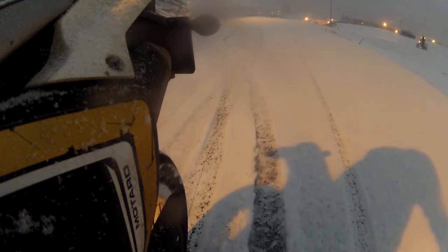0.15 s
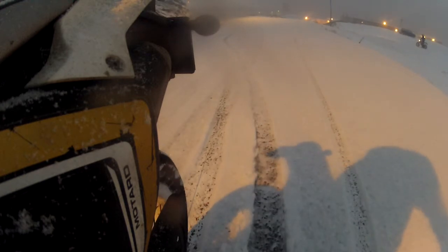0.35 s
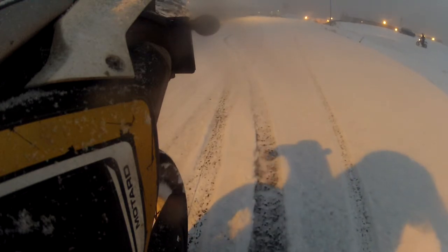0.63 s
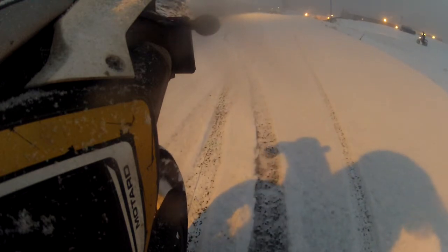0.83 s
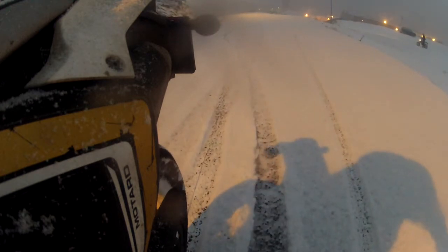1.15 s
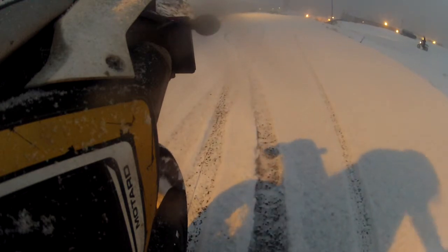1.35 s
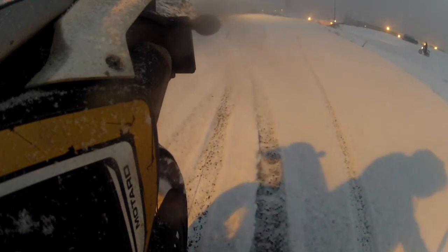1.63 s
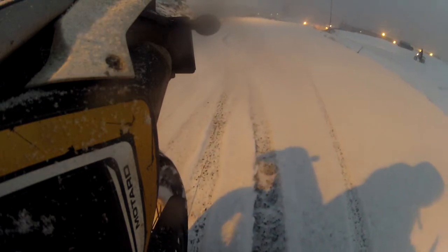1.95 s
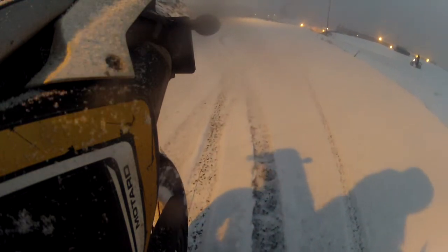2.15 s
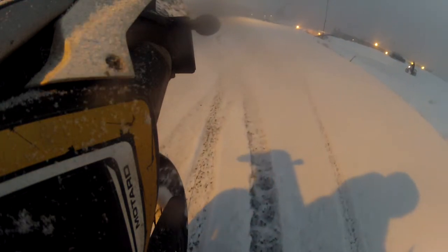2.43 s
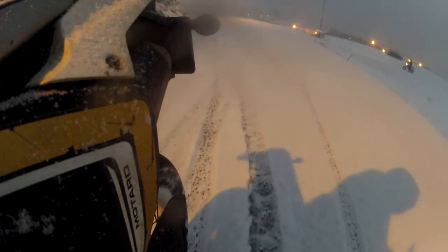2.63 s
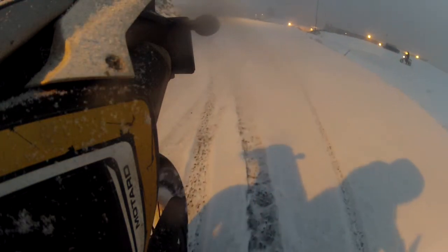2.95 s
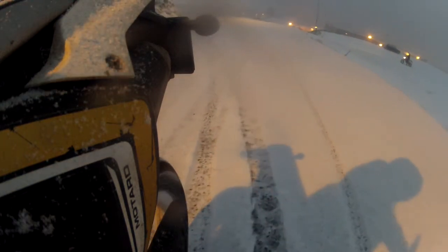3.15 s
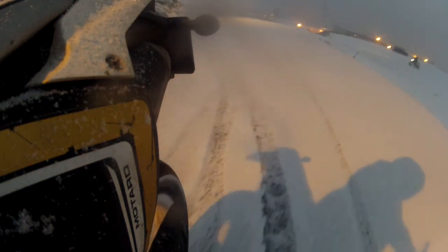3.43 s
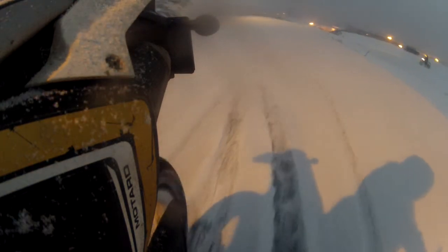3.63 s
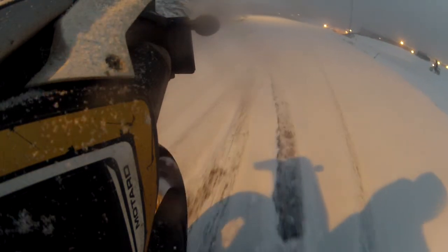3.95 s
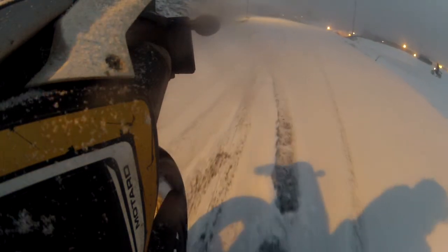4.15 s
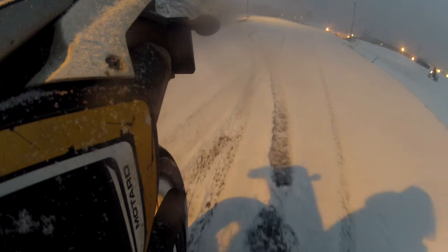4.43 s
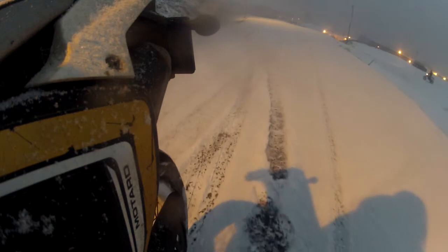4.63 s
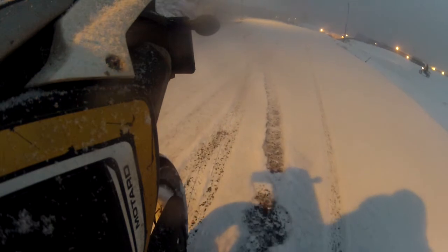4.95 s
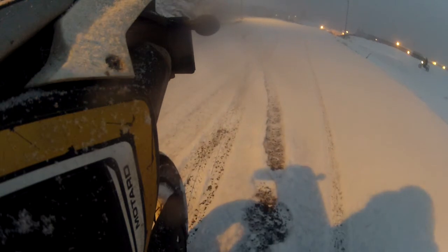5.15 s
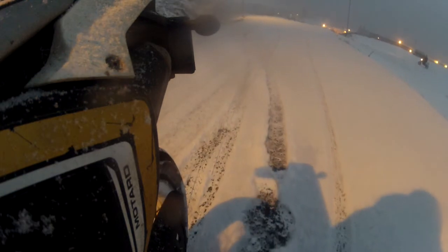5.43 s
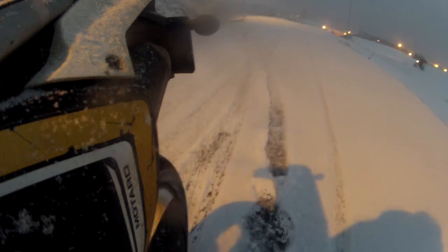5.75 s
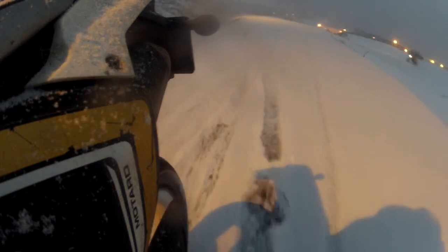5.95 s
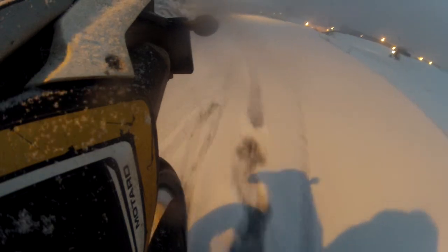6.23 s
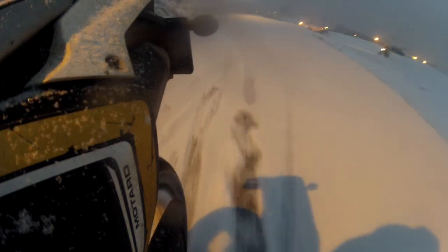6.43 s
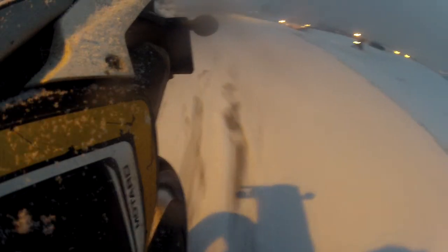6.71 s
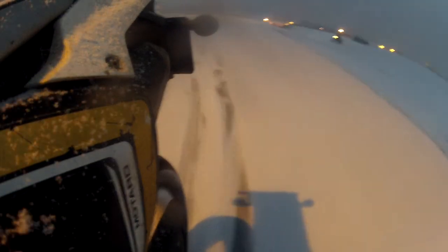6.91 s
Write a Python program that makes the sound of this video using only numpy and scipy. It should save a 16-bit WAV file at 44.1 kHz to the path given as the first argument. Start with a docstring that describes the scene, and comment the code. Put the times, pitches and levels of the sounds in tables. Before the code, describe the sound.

A small two-stroke motorbike sinks to a sputtering, popping idle, then is revved several times and finally screams away, heard gritty and close from the bike.

```python
"""A small two-stroke motorbike runs down to a popping idle, then is revved four times on a snowy road.
Every crank turn pumps a puff through airbox and exhaust; only turns that fire add a sharp crack.
The piston rattles in between; chain, tyres and air rush underneath.
A camera on the bike limits the peaks, samples at a low rate and holds each sample, which mirrors the
sound into a gritty treble."""
import sys
import numpy as np
from scipy import signal
from scipy.fft import rfft, irfft
from scipy.io import wavfile
from scipy.ndimage import uniform_filter1d

SR = 44100
rng = np.random.default_rng(int(sys.argv[2]) if len(sys.argv) > 2 else 0)


def store_wav(level_fs):
    """Save 16-bit WAV to argv[1]."""
    pcm = np.round(np.clip(np.atleast_2d(level_fs), -1, 1) * 32767)
    wavfile.write(sys.argv[1], SR, pcm.T.astype(np.int16))


N = 312224
TIME = np.arange(N) / SR   # [s]


def from_db(db):
    """Decibels to gain."""
    return 10 ** (np.asarray(db) / 20)


def in_time(rows):
    """Interpolate each column of a time table at every sample."""
    time_s, *columns = np.transpose(rows)
    return [np.interp(TIME, time_s, column) for column in columns]


def at_speed(rows, speed):
    """Read a (crank speed, level) table at the crank speed."""
    turns_per_s, db = np.transpose(rows)
    return np.interp(speed, turns_per_s, db)


def rms_one(x):
    """Scale to unit power."""
    return x / np.sqrt(np.mean(x ** 2) + 1e-20)


def evened(x, size=2600):
    """Unit power from moment to moment; detail shorter than the window [samples] keeps its shape."""
    power = uniform_filter1d(uniform_filter1d(x ** 2, size), size)
    return x / np.sqrt(np.abs(power) + 1e-14)


def cut(x, hz, kind, order=2):
    """Butterworth low-pass or high-pass."""
    return signal.sosfilt(signal.butter(order, hz, kind, fs=SR, output="sos"), x)


def resonate(x, modes):
    """Parallel two-pole resonances with alternating signs."""
    out = 0
    for k, (hz, width_hz, db) in enumerate(modes):
        radius = np.exp(-np.pi * width_hz / SR)
        poles = [1, -2 * radius * np.cos(2 * np.pi * hz / SR), radius ** 2]
        gain = (-1) ** k * from_db(db) * (1 - radius ** 2) / 2
        out = out + gain * signal.lfilter([1, 0, -1], poles, x + 1e-18)
    return out


def clicks(times_s, sizes):
    """Impulses placed between samples."""
    at = np.clip(times_s * SR, 0, N - 2)
    out = np.zeros(N)
    np.add.at(out, at.astype(int), sizes * (1 - at % 1))
    np.add.at(out, at.astype(int) + 1, sizes * (at % 1))
    return out


def gush(pulses, decay_s, rise_s=0.00011):
    """Turbulence after each pulse: noise that swells briefly and dies, with about the pulse's energy."""
    decay, swell = np.exp(-1 / (np.array([decay_s, rise_s]) * SR))
    envelope = signal.lfilter([np.sqrt(1 - decay ** 2)], [1, -decay], pulses + 1e-18)
    return signal.lfilter([1 - swell], [1, -swell], envelope) * rng.standard_normal(N)


def scatter(x, delays_s=(0.0009, 0.0014, 0.0023), reflection=0.38):
    """Reflections between the baffles, as all-passes, spread a pulse in time alike on every turn."""
    for delay_s in delays_s:
        poles = np.r_[1, np.zeros(int(delay_s * SR)), -reflection]
        x = signal.lfilter(poles[::-1], poles, x + 1e-18)
    return x


# chain, tyres and air, relative spectral density: (frequency [Hz], level [dB per Hz])
ROLLING_SPECTRUM = [(20, -7), (60, 4), (200, 4), (400, -0.5), (680, -17.5), (950, -10), (1300, -17.5),
                    (2000, -29), (2500, -49), (2900, -33.5), (4000, -31), (5800, -48)]


def rolling(speed):
    """A smooth rush of chain, tyres and air: shaped noise that grows with crank speed."""
    hz, db = np.transpose(ROLLING_SPECTRUM)
    bins_hz = np.maximum(np.arange(N // 2 + 1) * SR / N, 1)
    shape = from_db(np.interp(np.log(bins_hz), np.log(hz), db))
    rush = irfft(rfft(rng.standard_normal(N)) * shape, N)
    return from_db(-31.0 + 1.85 * np.log2(speed / speed.min())) * rms_one(rush)


# shake of the unbalanced crank: (crank speed [turns/s], level [dB])
SHAKE_LEVEL = [(22, -42), (34, -49), (44, -23), (54, -26), (68, -38), (72, -23), (78, -39), (100, -86)]


def shake(angle, speed):
    """The unbalanced crank shakes the frame once a turn, at a level that depends on speed."""
    return from_db(at_speed(SHAKE_LEVEL, speed)) * np.sqrt(2) * np.cos(2 * np.pi * angle)


# piston rattle resonances: (frequency [Hz], width [Hz], relative level [dB])
PISTON_MODES = [(2160, 92, 8.5), (2510, 380, -14.5), (1854, 330, -2.5), (1200, 174, 9)]


def piston(angle, speed, slap_turn=0.849, width_turn=0.11, spread_db=3.84):
    """The piston rattles across the bore shortly before each port opening."""
    turn = (angle - angle.min() // 1).astype(int)
    strength = from_db(spread_db * rng.standard_normal(turn.max() + 1))[turn]
    gate = np.exp(-0.5 * ((angle % 1 - slap_turn) / width_turn) ** 2)
    ringing = evened(resonate(rng.standard_normal(N), PISTON_MODES), size=160)
    rattle = cut(ringing, 2800, "low", order=6)
    level = from_db(-31 + 3.65 * np.log2(speed / speed.min()))
    return level * strength * gate * rattle


# throttle held open, every turn fires: (opens [s], closes [s], relative crack level [dB])
OPEN_THROTTLE = [(2.785, 3.755, -19.5), (4.615, 4.748, -20), (4.9, 5.027, -19.5), (5.395, 7.1, -18.5)]


def throttle():
    """1 while the throttle is open, 0 while it is closed, with smoothed edges."""
    held_open = sum((TIME > opens_s) * (TIME < closes_s) for opens_s, closes_s, _ in OPEN_THROTTLE)
    return np.clip(uniform_filter1d(held_open.astype(float), size=1300), 0, 1)


def firing_strength(turn_s, edge_s=0.044, edge_db=-6.5):
    """Crack size on each turn: weaker near opening and closing, zero while the throttle is closed."""
    sizes = 0
    for opens_s, closes_s, db in OPEN_THROTTLE:
        inside_s = np.minimum(turn_s - opens_s, closes_s - turn_s)
        edge = np.clip(1 - inside_s / edge_s, 0, 1)
        sizes = sizes + (inside_s > 0) * from_db(db + edge_db * edge)
    return sizes


def puffs(turn_s, spread_db, turbulence, decay_s):
    """One uneven puff each time the port opens, trailed by turbulence."""
    pulses = clicks(turn_s, from_db(spread_db * rng.standard_normal(len(turn_s))))
    return pulses + turbulence * gush(pulses, decay_s)


# boom resonances: (frequency [Hz], width [Hz], relative level [dB])
AIRBOX_MODES = [(86.9, 6.5, 2), (85, 33.3, -11)]
EXHAUST_MODES = [(149.56, 7.3, 2), (165.3, 7, -2.5), (125.8, 12, -9.5)]
# relative loudness of the booms over time: (time [s], airbox level [dB], exhaust level [dB])
BOOM_LEVEL = [(0.0, -2, 2), (1.0, -1, 1.5), (1.55, 5, -0.5), (2.1, -2, 0), (2.85, 4, 5), (3.18, -6, -7),
              (3.55, -0.5, -0.5), (3.85, -3.5, 4), (4.1, -1.5, -9), (4.42, 2.5, -0.5), (4.75, -2.5, 4),
              (5.25, 0.5, 0.5), (7.08, 2, -2.5)]


def boom(turn_s, speed, racing, cruise_turns_per_s=76.7, port_open_turns=0.13, second_puff=0.41):
    """Airbox and exhaust swell whenever a multiple of the crank speed meets their resonance."""
    octaves = np.log2(speed / cruise_turns_per_s)
    airbox_trim_db, exhaust_trim_db = in_time(BOOM_LEVEL)
    airbox_db = 49.5 + 4.5 * octaves - 25 * racing + airbox_trim_db
    exhaust_db = 43.5 + 6 * octaves - 6 * throttle() + 3 * racing + exhaust_trim_db

    intake = puffs(turn_s, spread_db=1.0, turbulence=0.23, decay_s=0.027)
    # the intake draws again, more weakly, after each puff
    intake = intake + second_puff * np.interp(TIME - port_open_turns / speed, TIME, intake, left=0)
    airbox = cut(resonate(from_db(airbox_db) * intake, AIRBOX_MODES), 190, "low", order=4)

    outlet = puffs(turn_s, spread_db=0.3, turbulence=0.25 - 0.077 * racing, decay_s=0.015)
    exhaust = cut(resonate(from_db(exhaust_db) * outlet, EXHAUST_MODES), 196.5, "low", order=4)
    return airbox + exhaust


# resonances of silencer, untuned pipe, pipe in tune: (frequency [Hz], width [Hz], relative level [dB])
SILENCER_MODES = [(238.6, 52, -8), (274.7, 24, 6.5), (313, 54, -3.5), (394.2, 25.8, 5), (415, 29.5, -5),
                  (513, 28, -17.5)]
PIPE_MODES = [(843, 31, 8.5), (910.4, 14.2, 14.5), (1028, 7.7, 6), (1190, 36, 5.5), (1269, 63, -1),
              (1370, 85, -3), (1647, 58, -3.5), (1706, 20, 2.5), (2400, 83, -4)]
TUNED_PIPE_MODES = [(844, 310, -5.5), (1240, 60, 6.5), (1292, 34, 8.5), (1558, 140, 7), (1616, 144, 7.5),
                    (1754.4, 58, 8.5), (2157, 36, 4), (2423, 44, 5.5), (610, 150, -12)]
# drone peaks where twice the crank speed meets the silencer: (crank speed [turns/s], base level [dB])
DRONE_LEVEL = [(22, -31), (50, -29.5), (80, -32.5), (110, -34), (135, -25), (141, -24), (145, -33),
               (150, -27), (157, -28.5)]
# pipe rises from idle, steady at 70 to 144 turns/s, weaker above: (crank speed [turns/s], base level [dB])
PIPE_LEVEL = [(22, -35), (40, -30), (70, -25), (110, -24), (137, -25), (144, -24), (150, -28), (157, -30.5)]


def pumping(turn_s, speed, racing, drone_open_db=7, pipe_open_db=6.5):
    """Puffs drone in the silencer and rasp in the pipe; with open throttle the pipe tunes in and sings."""
    is_open = throttle()
    drone_db = at_speed(DRONE_LEVEL, speed) + drone_open_db * is_open
    pipe_db = at_speed(PIPE_LEVEL, speed) + pipe_open_db * is_open

    low = puffs(turn_s, spread_db=0.8, turbulence=0.3 - 0.1 * racing, decay_s=0.01)
    drone = cut(resonate(low, SILENCER_MODES), 273, "high", order=4)
    drone = cut(drone, 437, "low", order=4)
    # fast puffs merge and lose their edge
    drone = (1 - racing) * drone + racing * cut(drone, 237, "low")

    high = puffs(turn_s, spread_db=1.8, turbulence=0.6, decay_s=0.012)
    rasp = cut(resonate(high, PIPE_MODES), 630, "high", order=4)
    rasp = cut(rasp, 2970, "low", order=4)

    clean = puffs(turn_s, spread_db=0.7, turbulence=0.16, decay_s=0.005)
    song = cut(resonate(clean, TUNED_PIPE_MODES), 590, "high")
    song = cut(song, 2690, "low", order=4)

    tuned = is_open * (0.9 + 0.1 * racing)
    pipe = np.sqrt(np.abs(1 - tuned)) * evened(rasp) + from_db(0.5) * np.sqrt(tuned) * evened(song)
    return from_db(drone_db) * evened(drone) + from_db(pipe_db) * pipe


# expansion chamber resonances: (frequency [Hz], width [Hz], relative level [dB])
CHAMBER_MODES = [(374, 53.7, 7), (885, 21, 7), (1206, 77, 15.5), (1234.3, 57, 13), (1600, 53, 3),
                 (1680, 165, 6), (1718, 91, 10), (2203, 126, 6), (2360, 222, 7), (2547, 221, 4),
                 (2870, 330, -7.5), (3160, 250, -7.5), (3860, 530, -6.5), (4115, 230, -15.5),
                 (4283, 42, -14), (4870, 215, -11.5), (5120, 420, -11.5)]


def chamber(blast, echo_s=0.0038, echo=0.35):
    """A blowdown rings the expansion chamber and comes back, duller, from its end cone."""
    back = np.interp(TIME - echo_s, TIME, cut(blast, 3040, "low"), left=0)
    ringing = cut(resonate(blast + echo * back, CHAMBER_MODES), 172, "high")
    return cut(ringing, 5600, "low", order=4)


def putts(turn_s, speed, idle_turns_per_s=33, chance=0.45, putt_db=-24.5, recharge_s=0.049):
    """Weak firings on random idling turns with no pop near: rows (time [s], relative level [dB])."""
    apart_s = np.abs(turn_s[:, None] - np.array(STRAY_FIRINGS)[:, 0]).min(axis=1)
    idling = np.interp(turn_s, TIME, speed) < idle_turns_per_s
    fires = idling & (apart_s > recharge_s) & (rng.random(len(turn_s)) < chance)
    return np.c_[turn_s, putt_db + 1.5 * rng.standard_normal(len(turn_s))][fires]


# lone firings on a closed throttle: (time [s], relative level [dB])
STRAY_FIRINGS = [(0.0014, -6.5), (0.0763, -10.5), (0.0955, -8), (0.194, -6.5), (0.2587, -14), (0.3251, -7),
                 (0.42, -3.5), (0.5214, -5.5), (0.63, -6.5), (0.8579, -10), (0.974, -16), (1.057, -20),
                 (1.369, -25), (1.4626, -26), (1.5959, -23.5), (1.8066, -10), (1.919, -8), (2.0239, -8),
                 (2.1284, -24), (2.163, -22), (2.2334, -11.5), (2.3446, -10.5), (2.5373, -23.5),
                 (2.6598, -14), (2.7376, -16), (2.77, -6.5), (3.8709, -6.5), (3.8847, 0.5), (4.0337, -4),
                 (4.124, -12), (4.143, -6), (4.3294, -3), (4.4227, -0.5), (4.5205, -4.5), (4.5998, -2.5),
                 (4.8391, -4), (4.8571, -4), (4.8912, -0.5), (5.1514, -0.5), (5.166, -5.5), (5.3278, -4),
                 (5.3421, -3), (5.386, 0)]


def pops(turn_s, speed, soft_hz=1900, soft_db=-24, hard_db=-10):
    """Stray firings on the overrun; weak ones burn slowly and dully, all leave the silencer ringing."""
    time_s, db = np.transpose(np.vstack([STRAY_FIRINGS, putts(turn_s, speed)]))
    hard = np.clip((db - soft_db) / (hard_db - soft_db), 0.4, 1)
    pulses = clicks(time_s, from_db(db) * hard)
    dull = clicks(time_s, from_db(db) * (1 - hard))
    crack = 0.3 * pulses + gush(pulses, decay_s=0.0025) + 0.35 * gush(pulses, decay_s=0.01)
    thud = cut(dull + gush(dull, decay_s=0.0056), soft_hz, "low")
    shove = clicks(time_s, np.sqrt(from_db(db)))
    ringing = from_db(27) * cut(resonate(shove, SILENCER_MODES), 1400, "low")
    return from_db(23.5) * chamber(crack + 5.2 * thud) + ringing


# silencer body, rung by open-throttle firings below racing speed:
# (frequency [Hz], width [Hz], relative level [dB])
BODY_MODES = [(234, 16, 2.5), (444, 20, 3)]


def under_power(turn_s, speed, racing, racing_crack_db=-3, body_db=21):
    """Open throttle: every turn cracks and hisses; at racing speed the cracks merge into a scream."""
    sizes = firing_strength(turn_s) * from_db(racing_crack_db * np.interp(turn_s, TIME, racing))
    unevenness = from_db(0.6 * rng.standard_normal(len(turn_s)))
    # scaled so that power does not rise with the firing rate
    per_turn = np.sqrt(SR / np.interp(turn_s, TIME, speed))
    pulses = clicks(turn_s, sizes * unevenness * per_turn)
    crack = 0.7 * (1 - 0.89 * racing) * pulses + (0.28 + 0.15 * racing) * scatter(pulses)
    turbulence = (0.19 - 0.06 * racing) * gush(pulses, decay_s=0.004)
    hiss = (0.3 - 0.15 * racing) * cut(gush(pulses, decay_s=0.005), 2700, "high", order=4)
    scream = 0.6 * racing * cut(scatter(scatter(pulses)), 2700, "high", order=4)
    body = from_db(body_db) * (1 - racing) * cut(resonate(pulses, BODY_MODES), 520, "low")
    return from_db(14.5) * chamber(crack + turbulence + hiss + scream) + body


# crank speed before rounding: (time [s], speed [turns/s])
CRANK_SPEED = [(0.0, 54.5), (0.7, 32.1), (1.1, 22.0), (1.76, 23.3), (2.01, 29.8), (2.71, 23.4), (2.88, 53),
               (3.04, 84.4), (3.11, 78.5), (3.2, 80), (3.37, 73), (3.56, 78.3), (3.68, 71.3), (3.79, 70),
               (4.3, 44.7), (4.59, 37.3), (4.73, 62), (4.88, 55.7), (5.01, 84.5), (5.39, 67), (5.47, 87),
               (5.58, 138), (5.635, 159), (5.715, 134.5), (5.785, 147), (5.86, 145), (6.03, 144.3),
               (6.15, 135), (6.23, 135.3), (6.32, 143), (6.42, 138.5), (6.54, 145.7), (6.94, 155),
               (7.08, 154.7)]


def crank():
    """Crank speed [turns/s], rounded by the flywheel, and angle [turns]; pops fall on whole turns."""
    speed = uniform_filter1d(in_time(CRANK_SPEED)[0], size=1300)
    angle = np.cumsum(speed) / SR
    pop_s = np.array(STRAY_FIRINGS)[:, 0]
    offset = np.unwrap(np.interp(pop_s, TIME, angle) % 1, period=1)
    return speed, angle - np.interp(TIME, pop_s, offset)


def scene():
    """All sources follow the one crankshaft."""
    speed, angle = crank()
    turn_s = np.interp(np.arange(np.ceil(angle[0]), angle[-1]), angle, TIME)
    racing = np.clip((speed - 72) / 55, 0, 1)   # 0 up to 72 turns/s, 1 from 127
    background = rolling(speed) + shake(angle, speed) + piston(angle, speed)
    engine = boom(turn_s, speed, racing) + pumping(turn_s, speed, racing)
    firings = pops(turn_s, speed) + under_power(turn_s, speed, racing)
    return (background + engine + firings)[None]


def limiter(x, limit_db=0.76, release_db_per_s=22):
    """Peaks pull the gain down at once; it recovers slowly."""
    over_db = np.maximum(20 * np.log10(np.abs(x) + 1e-9) - limit_db, 0)
    recovery_db = release_db_per_s * TIME
    held_db = np.maximum.accumulate(over_db + recovery_db, axis=1) - recovery_db
    return x * from_db(-uniform_filter1d(held_db, size=200))


def record(dry, sampler_hz=12000, cutoff_hz=15400):
    """Limiter, then slow sampling with overload; holding mirrors the spectrum around the sampling rate."""
    slow = signal.resample_poly(limiter(dry), sampler_hz, SR, axis=1, window=("kaiser", 4))
    sampled = np.clip(slow, -1, 1)
    held = np.repeat(sampled, 4, axis=1)
    held = signal.resample_poly(held, SR, 4 * sampler_hz, axis=1)[:, :N]
    low_pass = signal.firwin(301, cutoff_hz, fs=SR)[None]
    return signal.fftconvolve(held, low_pass, "same", axes=1)


dry = scene()
out = record(dry)
store_wav(out)
```